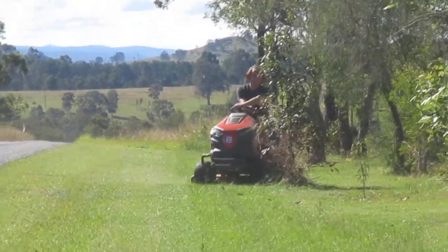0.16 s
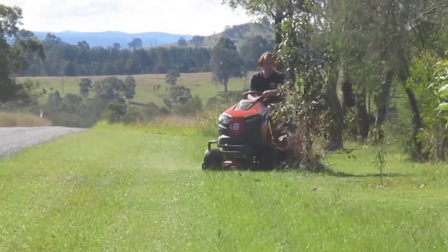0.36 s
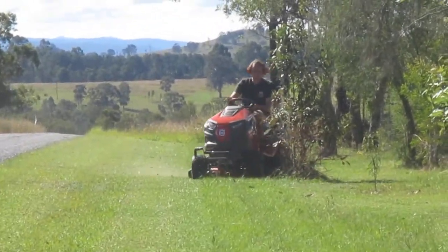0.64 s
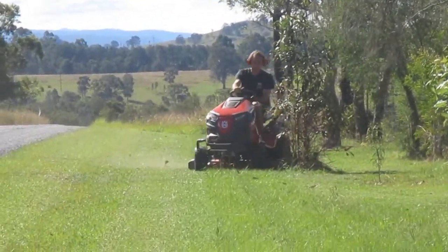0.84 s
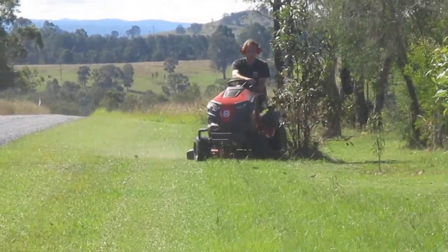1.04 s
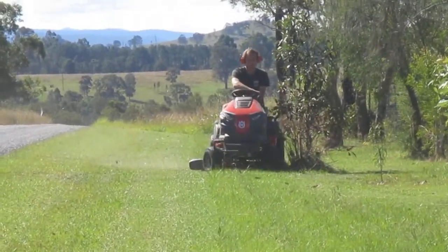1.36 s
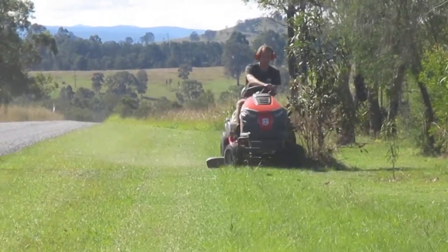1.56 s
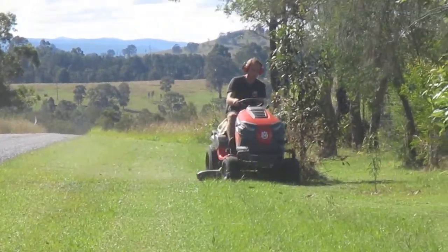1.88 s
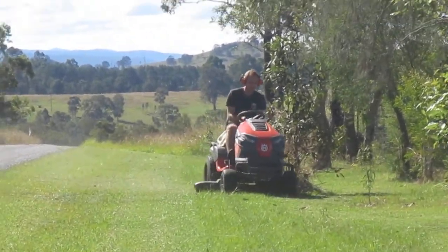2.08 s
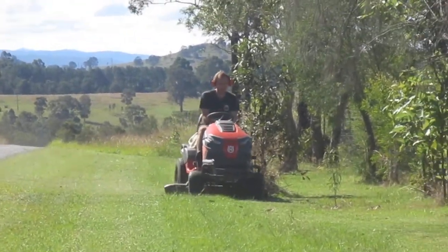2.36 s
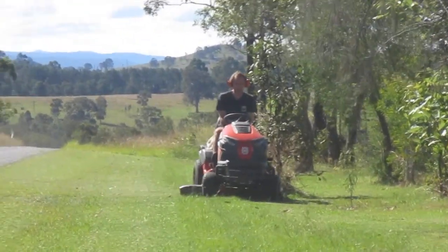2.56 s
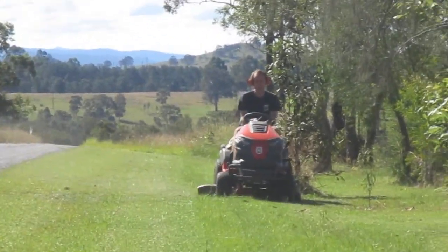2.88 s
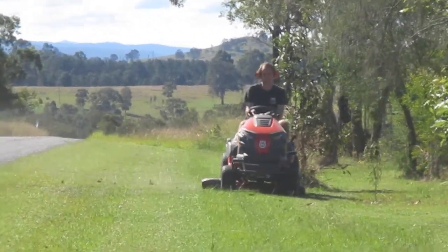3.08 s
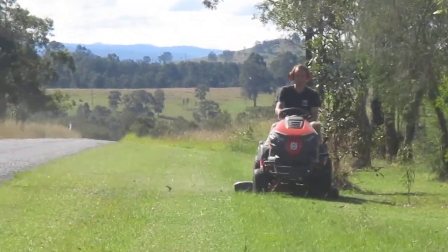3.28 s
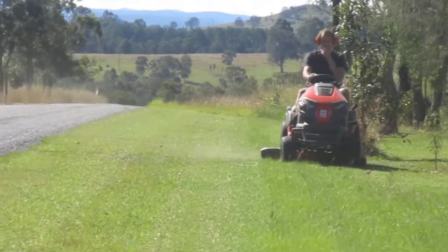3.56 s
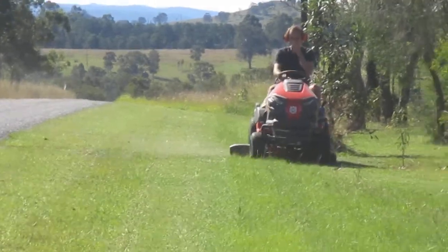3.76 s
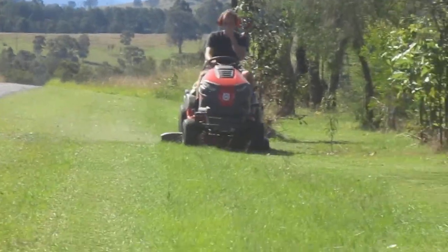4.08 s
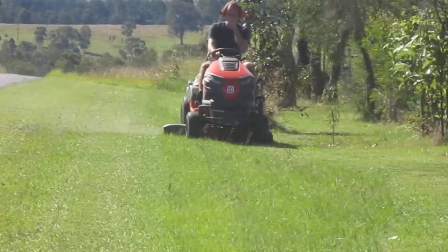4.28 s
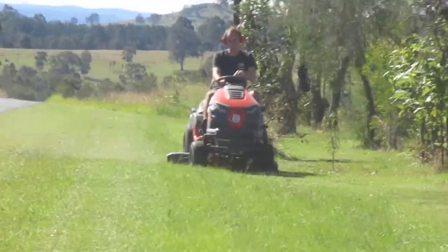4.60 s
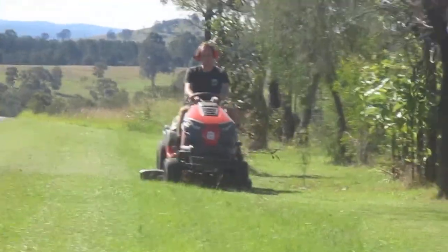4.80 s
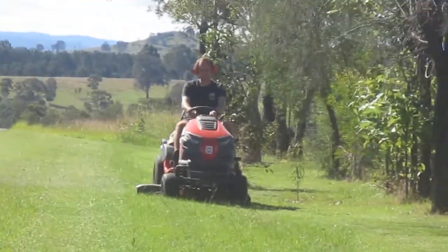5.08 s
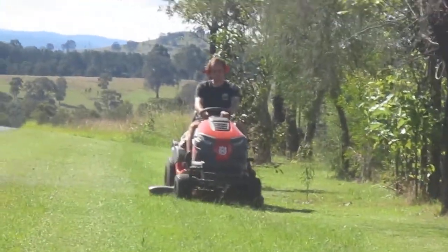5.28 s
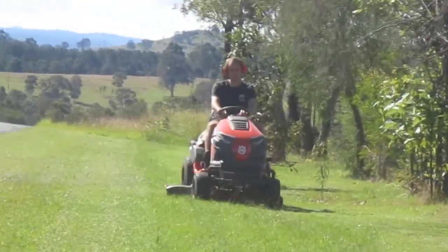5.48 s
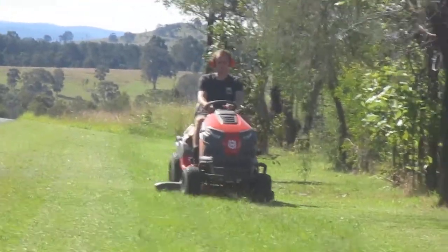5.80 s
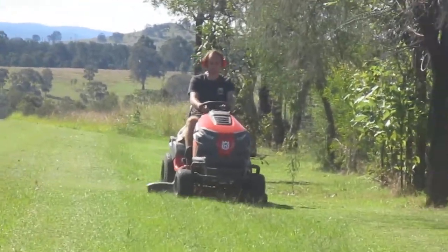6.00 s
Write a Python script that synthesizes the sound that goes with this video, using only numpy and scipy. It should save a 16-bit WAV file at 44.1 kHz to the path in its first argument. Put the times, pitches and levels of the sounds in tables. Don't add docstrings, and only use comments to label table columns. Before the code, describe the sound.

Steady throaty mower engine with hissing cut grass and ticking panels draws nearer outdoors as wind buffets bump and briefly duck the sound.

```python
import sys
import numpy as np
from scipy import signal
from scipy.fft import rfft, irfft
from scipy.io import wavfile
from scipy.ndimage import uniform_filter1d

SR = 44100
rng = np.random.default_rng(int(sys.argv[2]) if len(sys.argv) > 2 else 0)


def unload_wav(signal):
    wavfile.write(
        sys.argv[1],
        SR,
        np.round(np.clip(np.atleast_2d(signal).T, -1, 1) * 32767).astype(np.int16),
    )


def magnitude_from_level(level_db):
    exponent = np.asarray(level_db, float) / 20
    return 10 ** exponent


N = 270774

# (time [s], four-stroke cycles [per s])
ENGINE_SPEED = [
    (0, 26.144),
    (4.15, 26.144),
    (4.4, 26.31),
    (4.9, 26.31),
    (5.2, 26.19),
    (6.14, 26.23),
]
# (multiple of the cycle rate, level [dB])
EXHAUST_TONES = [(2, -12), (3, -19), (4, -1), (5, 0), (6, 1), (7, -8), (8, -2), (9, -5), (10, -3), (11, -8),
                 (12, -5), (13, -18), (14, -16), (15, -23), (16, -22), (19, -19), (20, -15.5), (21, -24),
                 (22, -17), (23, -25), (24, -20), (25, -25), (26, -12), (28, -27), (30, -19)]
# (multiple of the cycle rate, level above the clatter [dB])
WHINE_TONES = [
    (48, -8),
    (54, -10),
]
# (place [share of cycle], strength, ring [Hz], ring width [Hz])
GAS_PULSES = [
    (.778, -1.7, 103, 85),
    (.169, -.7, 204, 155),
    (.413, .8, 126, 150),
    (.446, .33, 260, 120),
]
# (place [share of cycle], swell [dB])
ROAR_PUFFS = [(.02, 3), (.5, 2), (.8, 3)]
# (frequency [Hz], level [dB per Hz])
ROAR_COLOUR = [(25, -12), (100, -6), (145, -9), (200, -3), (260, 2), (310, -3), (380, -4), (450, -9),
               (520, -2), (660, -.5), (840, -5), (960, -18), (1400, -45), (3000, -90)]
# (frequency [Hz], level [dB per Hz])
HISS_COLOUR = [(530, -31), (900, -1), (1140, -5), (1370, -3), (1730, -14.5), (1880, -9), (2250, -15),
               (2450, -10), (2790, -10), (3890, -15), (5490, -17.5), (6040, -19), (7670, -20), (11600, -33),
               (15500, -45)]
# (frequency [Hz], width [Hz], level [dB])
PANEL_RINGS = [(1050, 40, -2), (1910, 90, -3), (2490, 100, -4), (2800, 70, -3), (3250, 100, -5),
               (4090, 60, -8), (4870, 60, -10), (5460, 160, -11), (6395, 60, -11), (7800, 180, -12),
               (9150, 180, -17), (11200, 160, -21), (11800, 100, -24)]
# (time [s], muffler shell [dB], hood [dB], frame [dB])
BODY_SWELLS = [(0, 6, -6, -2), (.9, 8, -7, 4), (1.4, 5, -5, 6), (1.9, -8, 1, 5), (2.6, -6, 1, -5),
               (3.1, 2, -6, -2), (3.7, 0, 2, -4), (4.5, 8, 1, 0), (5.3, 4, -2, -2), (6.14, 0, -1, -6)]
# (time [s], level [dB])
CHAFF_SPRAYS = [(.47, -61), (1.335, -56), (1.8, -57), (1.9, -55), (2.75, -56), (3.12, -50), (3.65, -51.5),
                (4.35, -52.5), (4.62, -47.5), (5.58, -46.5)]
# (time [s], clatter [dB], engine load on the roar [dB], facing [0 flank to 1 front])
APPROACH_PATH = [(0, -54, 1, 0.33), (.5, -50, 0.5, 0.017), (.86, -49, -1, -0.31), (1.7, -48.5, .5, 0.155),
                 (2.3, -46.5, 1, -0.081), (2.8, -44, -1, -0.025), (3.5, -42, 0.5, 0.13),
                 (3.9, -42, 0.5, 0.19), (4.05, -43, 0.5, 0.85), (4.55, -43, 0.5, 0.577),
                 (5, -44.5, -2.5, 0.614), (5.3, -44, 0.5, 0.76), (5.6, -44, 2.5, 0.99),
                 (6.14, -43, 2, 0.52)]
# (time [s], depth [dB], clamp time [s], recovery time [s])
GAIN_DUCKS = [
    (.858, -7.5, .01, 1.52),
    (3.953, -10, 0.0233, 0.311),
]
# (time [s], peak [dB], frequency [Hz], length [cycles], direction [+1 push, -1 suck])
WIND_THUMPS = [(.042, -3.5, 172, 0.526, 1), (.238, -7, 179.5, 0.55, 1), (.266, -7.5, 217.5, 0.83, 1),
               (.8313, -3.5, 144.2, 0.84, 1), (.8315, -9, 95, 1.04, 1), (.8542, 0, 215, 1, -1),
               (3.95, -7, 152.4, 0.67, -1), (3.953, 1, 106, 2.65, 1), (3.962, -5, 204.5, 2.03, 1),
               (4.166, -11.5, 91, 1.52, -1), (4.707, -7.5, 170.3, 2.7, -1), (4.786, -5.5, 89.6, 0.91, 1),
               (4.788, -12.5, 70, 1.57, 1), (4.824, -2.5, 175, 1.4, -1)]
# (time [s], peak [dB], frequency [Hz])
EDDY_PUSHES = [(0.057, -15, 110), (.105, -11, 150), (0.136, -20, 175), (.183, -12.5, 110),
               (.217, -14.5, 140), (.3405, -14, 216), (.342, -12.5, 89), (.525, -15, 110), (.756, -11, 140),
               (.844, -16, 130.4), (1.5, -20, 111), (1.778, -16.5, 70), (1.994, -24, 80),
               (2.051, -19.5, 96), (3.972, -12, 120), (4.036, -14, 139), (4.063, -15.5, 110),
               (4.546, -13.5, 166), (4.989, -10, 107), (5.122, -10, 90), (5.453, -8, 100),
               (5.482, -17.5, 55), (5.664, -16.5, 100)]
# (time [s], peak [dB], frequency [Hz])
EDDY_PULLS = [(.247, -9, 120), (.3375, -9, 200), (.767, -13.5, 70), (2.072, -24.5, 70), (2.1, -16, 54.6),
              (4.655, -10.5, 169), (4.81, -12, 100), (5.005, -13.5, 276), (5.055, -14, 140),
              (5.071, -11.5, 89.4), (6.119, -18.5, 175)]
# (time [s], peak [dB], half length to fall 20 dB [s])
AIR_SWELLS = [(0.021, -24, .1), (.15, -24, .2), (0.301, -23, 0.17), (0.532, -26.5, 0.06),
              (0.751, -25, 0.01), (0.839, -12.5, 0.0535), (1.496, -26.5, 0.18), (1.78, -32.5, 0.15),
              (1.983, -25, .07), (2.1, -25, 0.04), (2.5, -39, 0.48), (2.68, -30, 0.37),
              (2.793, -27.5, 0.08), (3.41, -30, 0.11), (3.661, -28.5, 0.26), (3.947, -13.5, 0.092),
              (4.062, -32, 0.23), (4.163, -21, 0.1663), (4.678, -20, 0.12), (4.794, -14, 0.0057),
              (5.1, -23, .12), (5.47, -30, 0.8), (5.587, -15, 0.064)]
# (start [s], end [s], level [dB])
GUST_PEAKS = [
    (0.098, 0.348, -30),
    (0.775, 0.855, -33),
    (4.651, 5.099, -31),
]
# (multiple of the cycle rate, slide [radians per s], time in step [s])
BEAT_SLIDES = [
    (4, .37, 2.3),
    (5, -.1, 4.6),
]

ROAR_DB, BEAT_DB = 11.5, 25.5
FRONT_ROAR_DB, FRONT_BEAT_DB, FRONT_TILT_DB = 1.74, 2, -2.5
LOAD_BEAT_SHARE = 0.356
MIC_HISS_DB = -79.5
CALM_DB = -45
EDDY_CYCLES = 1.22
GUST_FADE_DB_PER_S = 201
CRACK_S, CRACK_DB, CRACK_HZ = .854, -17, 1200


def noise():
    return rng.standard_normal(N)


def unit(x):
    return x / np.sqrt(np.mean(x ** 2))


def colour(x, points):
    hz, db = np.transpose(points)
    f = np.maximum(np.fft.rfftfreq(N, 1 / SR), 1)
    gain = magnitude_from_level(np.interp(np.log(f), np.log(hz), db))
    return irfft(rfft(x) * gain, N)


def band(x, lo_hz, hi_hz):
    return signal.sosfilt(signal.butter(2, [lo_hz, hi_hz], "bandpass", fs=SR, output="sos"), x)


def walk(rate):
    k = int(SR / rate)
    steps = np.repeat(rng.standard_normal(N // k + 1), k)
    smooth = uniform_filter1d(uniform_filter1d(steps, k), k)
    return unit(smooth[:N])


def curve(rows):
    s, *columns = np.transpose(rows)
    return [np.interp(np.arange(N) / SR, s, c) for c in columns]


def pulse_timing(k, f):
    total = 0
    for at, size, hz, width in GAS_PULSES:
        ring = 1j * f * hz / (hz ** 2 - f ** 2 + 1j * f * width)
        total = total + size * np.exp(-2j * np.pi * k * at) * ring
    return np.angle(total)


def exhaust(cycle, tilt_db):
    t = np.arange(N) / SR
    shell_db, hood_db, frame_db = curve(BODY_SWELLS)
    body_db = {22: shell_db, 26: hood_db, 30: frame_db}
    out = 0
    for k, db in EXHAUST_TONES:
        timing = pulse_timing(k, k * ENGINE_SPEED[0][1])
        for multiple, rate, s in BEAT_SLIDES:
            if multiple == k:
                timing = timing + rate * (t - s)
        drift_db = .5 * min(k / 6, 3) * walk(4)
        tone_db = db + drift_db + tilt_db * np.log2(k / 6) + body_db.get(k, 0)
        out = out + magnitude_from_level(tone_db) * np.cos(2 * np.pi * k * cycle + timing)
    return unit(out) * magnitude_from_level(.5 * walk(60))


def swell_db(cycle):
    total = 0
    for at, db in ROAR_PUFFS:
        distance = (cycle - at + .5) % 1 - .5
        total = total + db * np.exp(-.5 * (distance / 0.0523) ** 2)
    return total


def roar(cycle, tilt_db):
    x = colour(noise() * magnitude_from_level(swell_db(cycle) + 1.1 * walk(10)), ROAR_COLOUR)
    x = x + 0.25 * np.maximum(-tilt_db, 0) * band(x, 420, 650)
    return x / np.std(band(x, 450, 900))


def clatter(cycle, tilt_db):
    gust = magnitude_from_level(.5 * walk(8.3) + 0.43 * walk(25.02) + 0.32 * swell_db(cycle))
    hiss = colour(noise() * gust, HISS_COLOUR)
    hiss = hiss / np.std(band(hiss, 1500, 8000))
    fuller = 0.261 * np.maximum(-tilt_db, 0) * band(hiss, 1013, 2047)
    hiss = hiss * magnitude_from_level(0.056 * tilt_db) + fuller

    struck = rng.random(N) < 1500 / SR
    ticks = struck * noise() * magnitude_from_level(2.0 * np.minimum(rng.exponential(size=N), 3)) * gust
    rings = 0
    for hz, width, db in PANEL_RINGS:
        ring = unit(band(ticks, hz - width / 2, hz + width / 2)) * np.sqrt(width / 100)
        flutter_db = 2.5 * walk(15) + 2.1 * walk(2.5)
        rings = rings + magnitude_from_level(db) * ring * magnitude_from_level(flutter_db + tilt_db * hz / 4000)

    whine = 0
    for k, db in WHINE_TONES:
        whine = whine + magnitude_from_level(db + 2.56 * walk(4.016)) * np.cos(2 * np.pi * k * cycle)
    return hiss + magnitude_from_level(-13) * rings + whine


def wind_rumble():
    t = np.arange(N) / SR
    rumble = colour(noise() * magnitude_from_level(2.0 * walk(30)),
                    [(12, -29), (30, -3.0), (65, -3.5), (110, -5), (200, -7), (500, -50), (2000, -100)])
    swells = magnitude_from_level(CALM_DB)
    for s, db, length in AIR_SWELLS:
        swells = swells + magnitude_from_level(db - 20 * np.abs(t - s) / length)
    return unit(rumble) * swells * magnitude_from_level(-3.5)


def wind_thumps():
    out = np.zeros(N)
    eddies = [(*row, EDDY_CYCLES, 1) for row in EDDY_PUSHES]
    eddies += [(*row, EDDY_CYCLES, -1) for row in EDDY_PULLS]
    for s, db, hz, cycles, way in list(WIND_THUMPS) + eddies:
        i = np.arange(int(s * SR) - 900, int(s * SR) + 2600)
        i = i[(i >= 0) & (i < N)]
        turn = (i / SR - s) * hz
        turn = np.where(turn < 0, 1.26 * turn, turn / (1 + 0.192 * np.abs(turn) / cycles ** 2))
        length = np.where(turn < 0, .55, .5 * cycles)
        shape = np.exp(-np.abs(turn / length) ** 1.59)
        out[i] += np.sign(way) * magnitude_from_level(db) * shape * np.cos(2 * np.pi * turn)
    return out


def wind_gusts():
    t = np.arange(N) / SR
    level = 0
    for start, end, db in GUST_PEAKS:
        outside_s = np.maximum(np.maximum(start - t, t - end), 0)
        level = level + magnitude_from_level(db - GUST_FADE_DB_PER_S * outside_s)
    swirls = colour(noise(), [(30, -9), (70, -0.5), (150, -0.5), (300, -6), (500, -14),
                              (1200, -72), (3000, -100)])
    return level * magnitude_from_level(5.35 * walk(50)) * unit(swirls)


def sprays():
    t = np.arange(N) / SR
    shower = sum(magnitude_from_level(db) * np.exp(-.5 * ((t - s) / 0.03) ** 2) for s, db in CHAFF_SPRAYS)
    chaff = colour(noise(), [(900, -15), (2500, 2), (6000, -6.5), (9000, -7.5),
                             (12000, -18.5), (16000, -35)])
    return shower * unit(chaff)


def membrane_crack():
    t = np.arange(N) / SR
    return -magnitude_from_level(CRACK_DB) * np.exp(-np.abs(t - CRACK_S) * 2 * np.pi * CRACK_HZ)


def duck_db():
    t = np.arange(N) / SR
    total = 0
    for s, db, clamp, back in GAIN_DUCKS:
        fall = np.clip((t - s) / clamp, 0, 1)
        recovery = np.exp(-np.maximum(t - s - clamp, 0) / back)
        total = total + db * fall * recovery
    return total


def scene():
    cycle = np.cumsum(curve(ENGINE_SPEED)[0]) / SR
    level_db, load_db, facing = curve(APPROACH_PATH)
    tilt_db = FRONT_TILT_DB * facing
    roar_db = ROAR_DB + load_db + FRONT_ROAR_DB * facing
    beat_db = BEAT_DB + LOAD_BEAT_SHARE * load_db + FRONT_BEAT_DB * facing
    mower = magnitude_from_level(beat_db) * exhaust(cycle, tilt_db)
    mower = mower + magnitude_from_level(roar_db) * roar(cycle, tilt_db)
    mower = mower + clatter(cycle, tilt_db)
    mower = mower * magnitude_from_level(level_db + duck_db())
    wind = wind_rumble() + wind_thumps() + wind_gusts() + membrane_crack()
    return (mower + wind + sprays() + magnitude_from_level(MIC_HISS_DB) * noise())[None]


def top_cut(x):
    return signal.sosfilt(signal.butter(12, 15620, fs=SR, output="sos"), x)


def record(dry):
    from_edge = np.minimum(np.arange(N), np.arange(N)[::-1])
    fade = np.minimum(from_edge / 60, 1)
    mix = np.clip(dry, -1, 1) * fade
    return top_cut(mix)


dry = scene()
out = record(dry)
unload_wav(out)
```